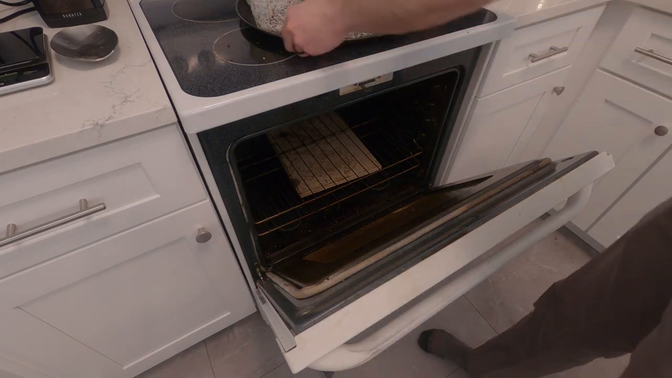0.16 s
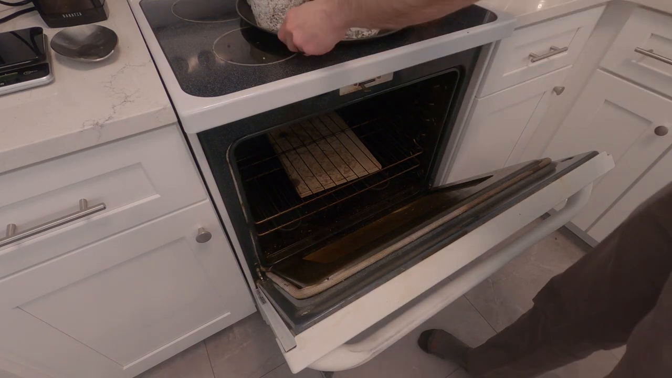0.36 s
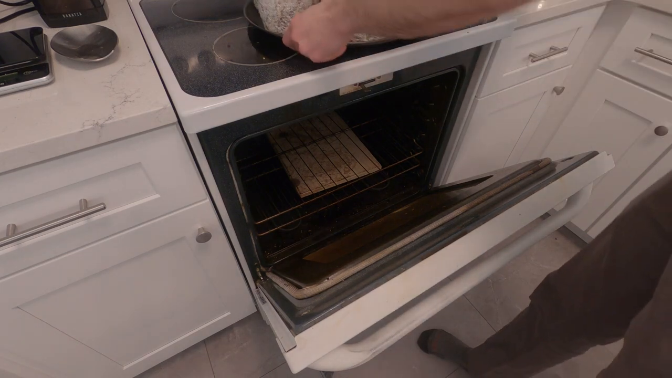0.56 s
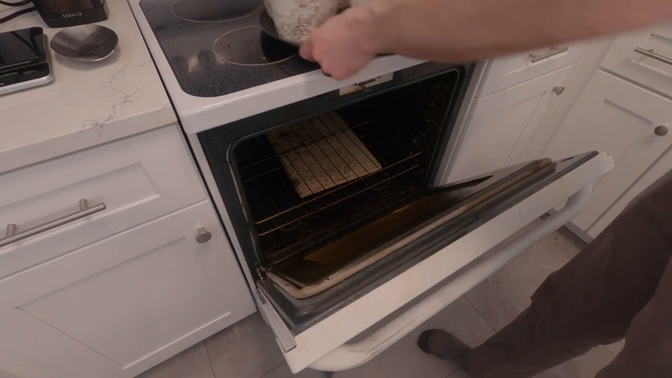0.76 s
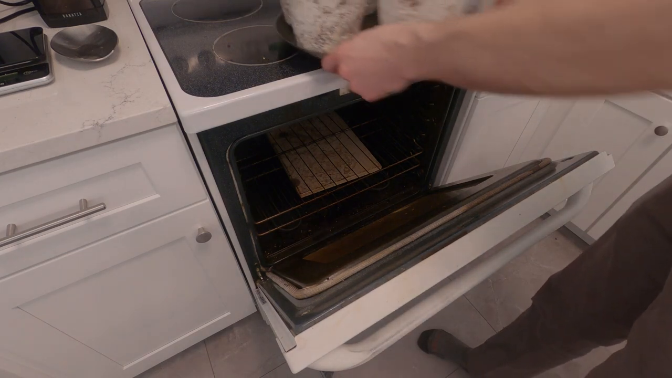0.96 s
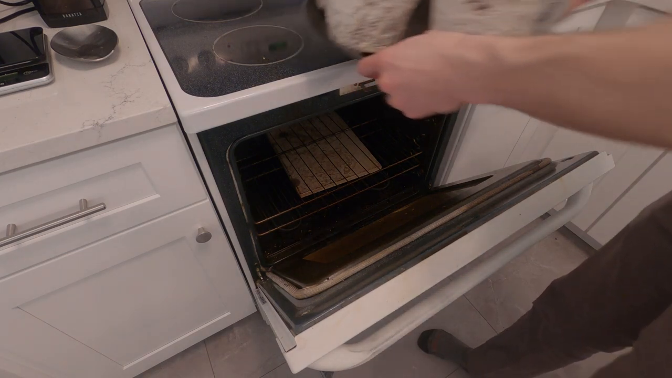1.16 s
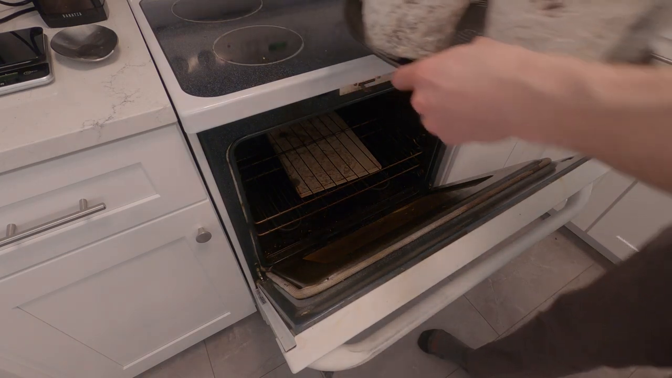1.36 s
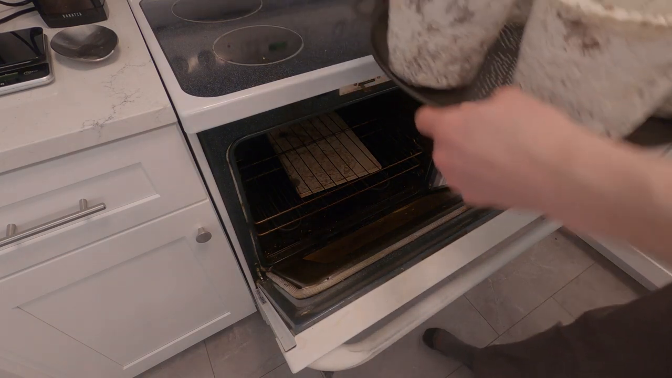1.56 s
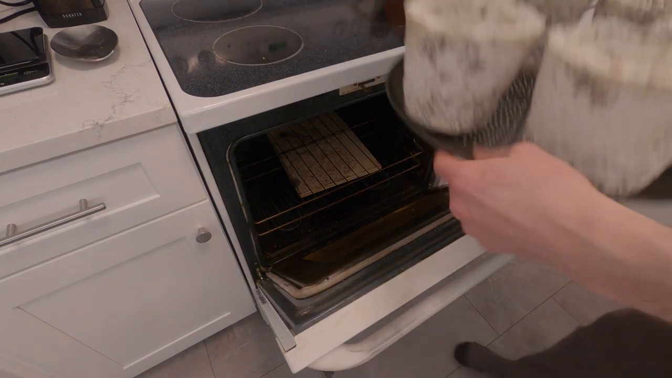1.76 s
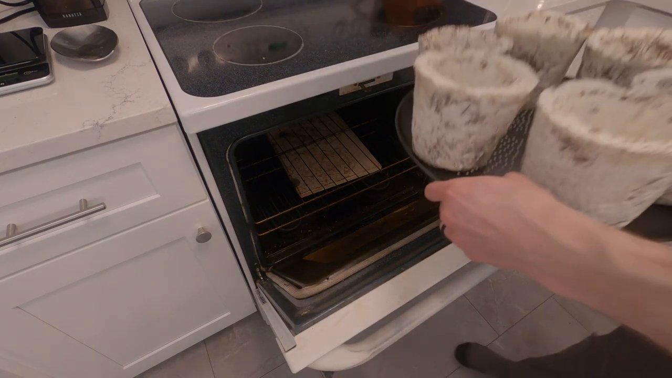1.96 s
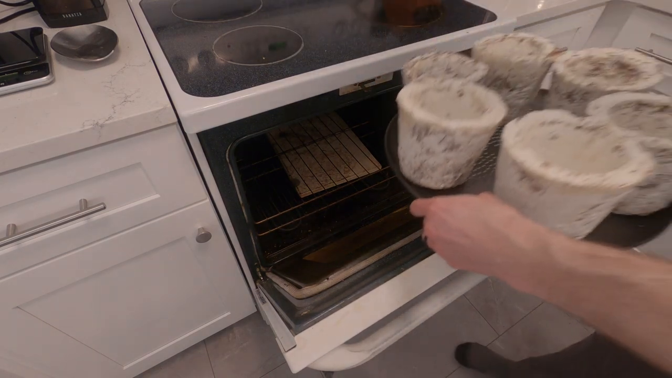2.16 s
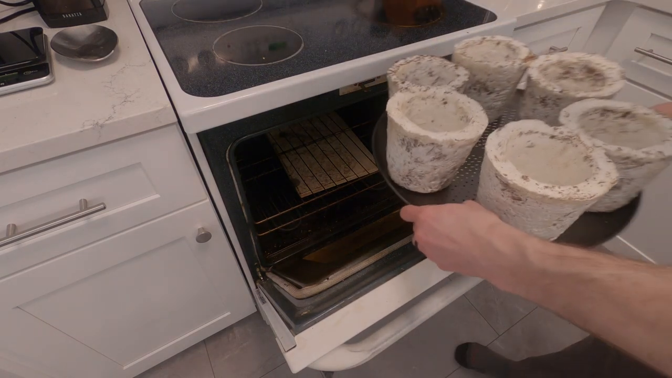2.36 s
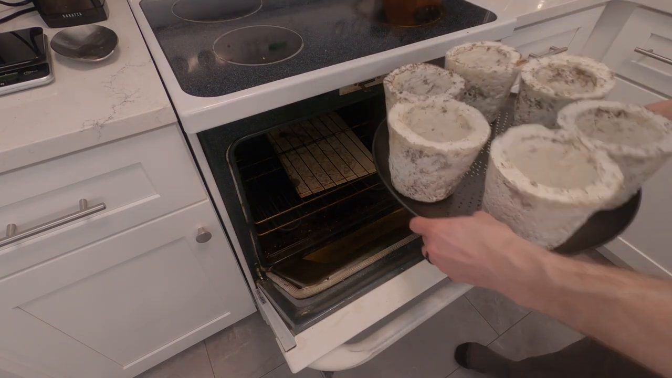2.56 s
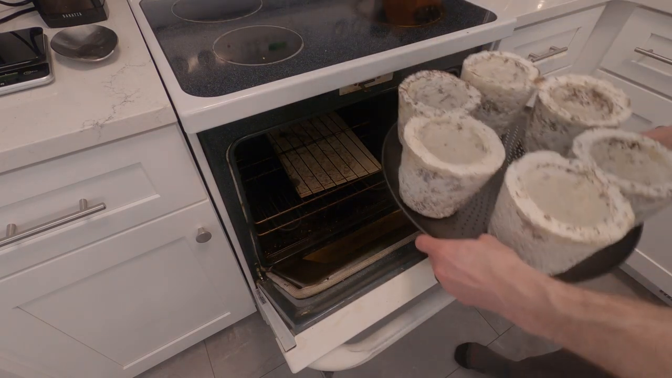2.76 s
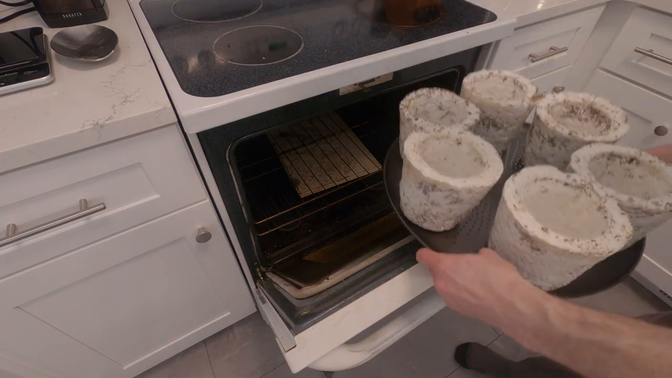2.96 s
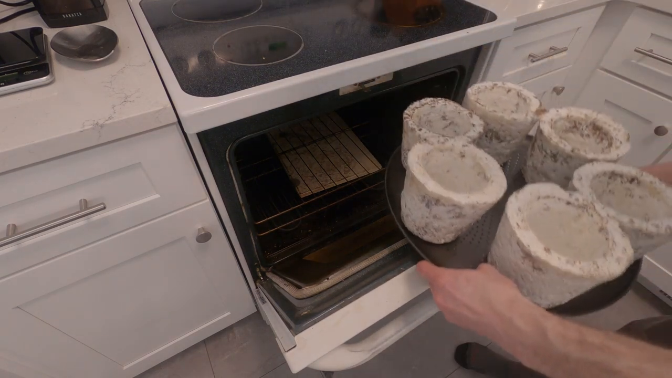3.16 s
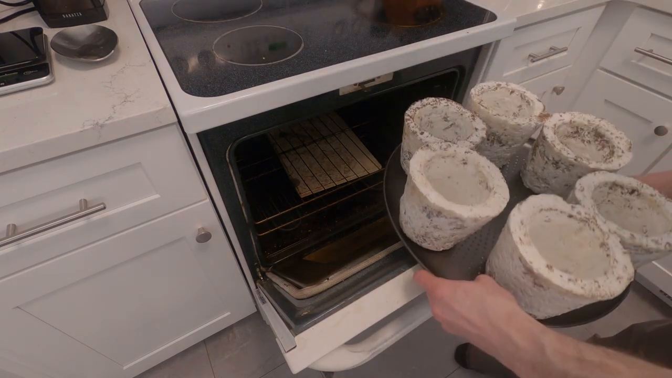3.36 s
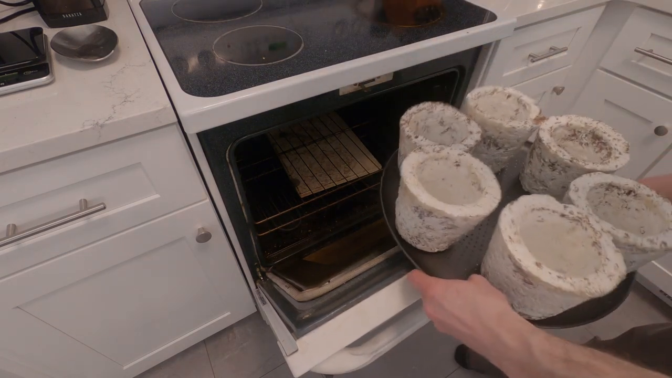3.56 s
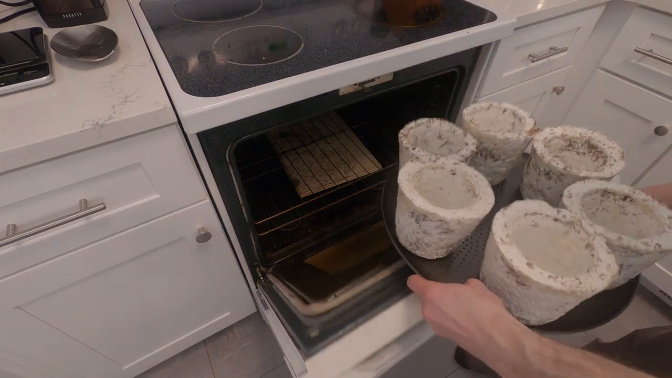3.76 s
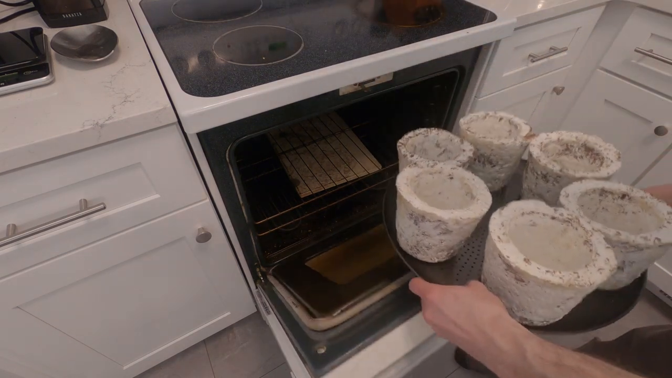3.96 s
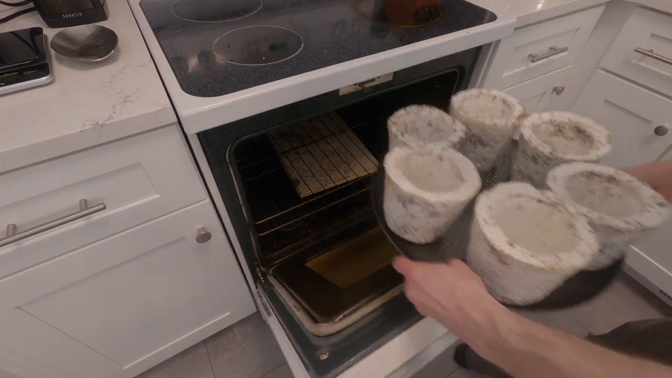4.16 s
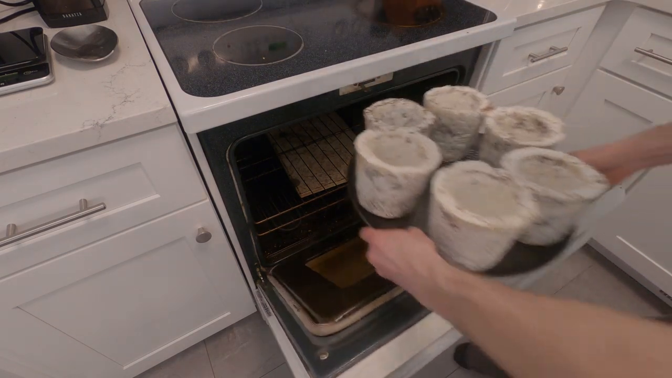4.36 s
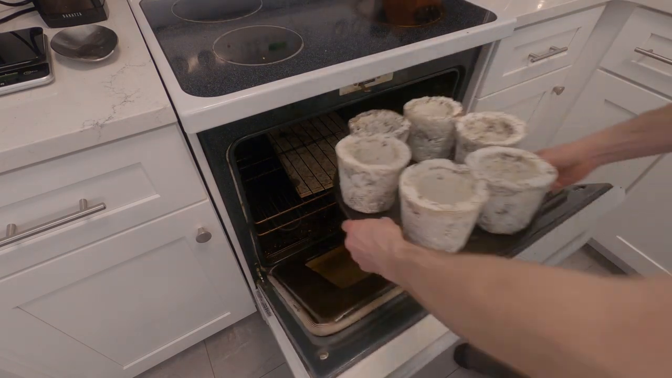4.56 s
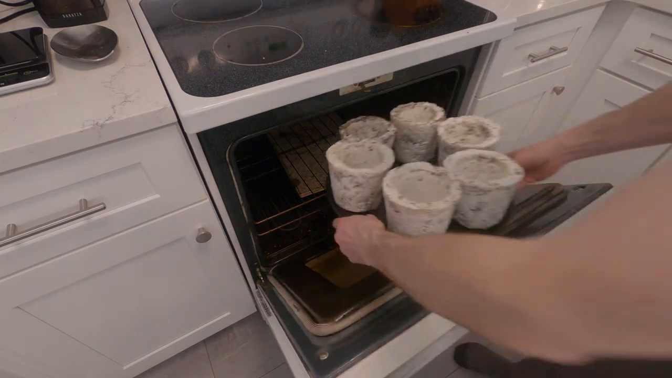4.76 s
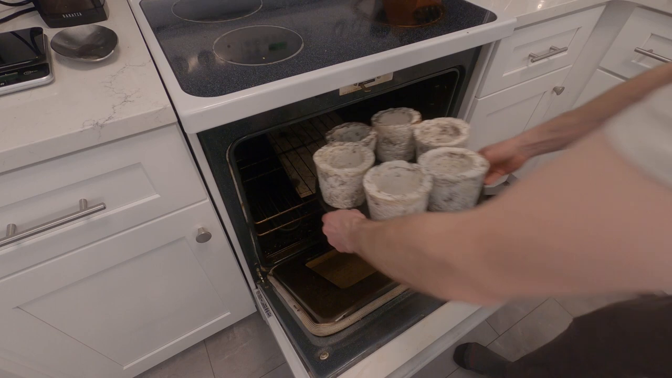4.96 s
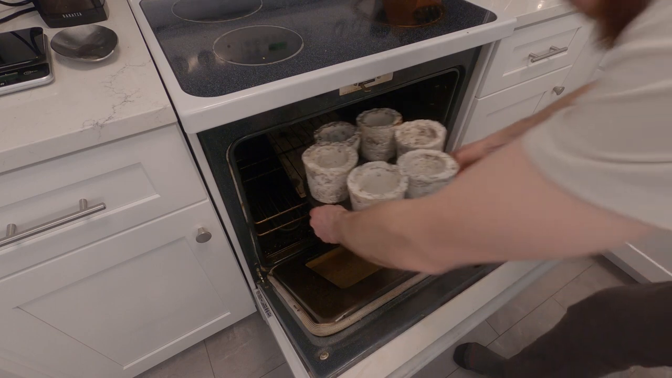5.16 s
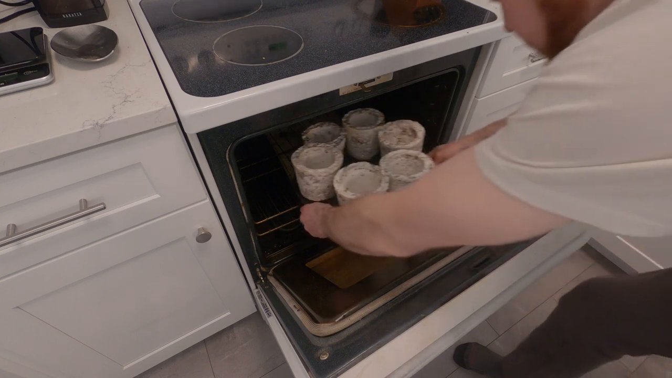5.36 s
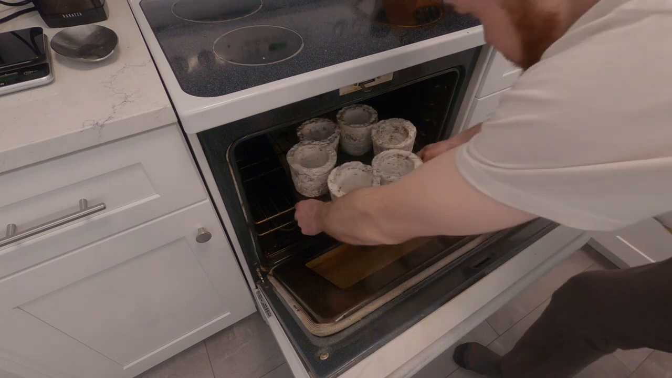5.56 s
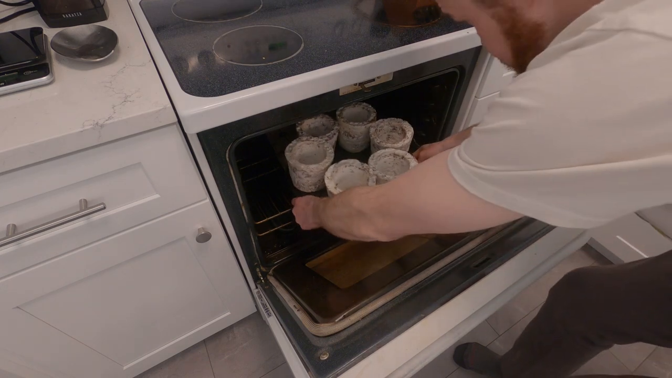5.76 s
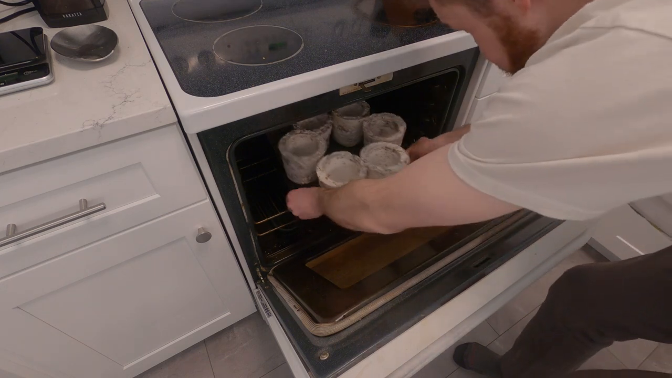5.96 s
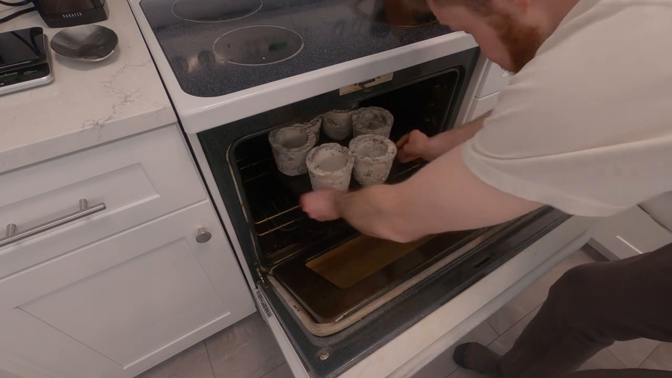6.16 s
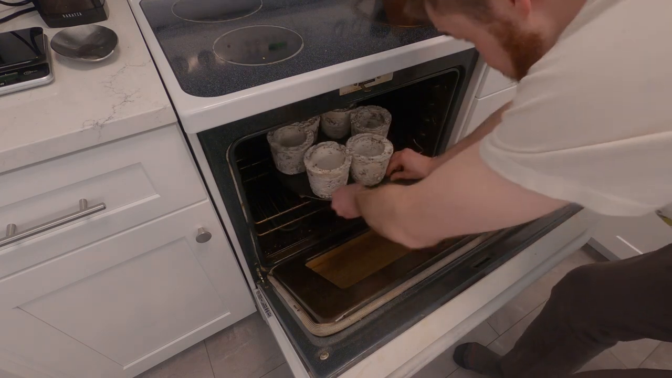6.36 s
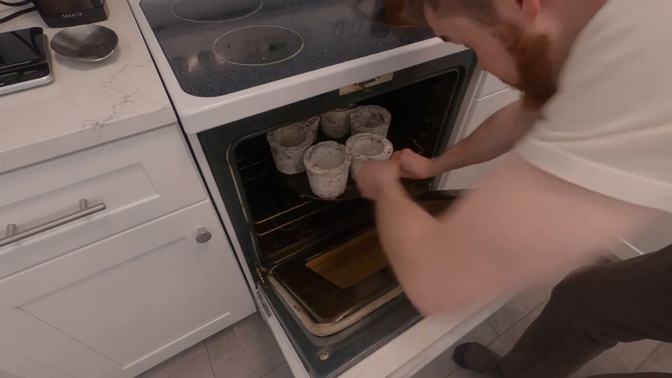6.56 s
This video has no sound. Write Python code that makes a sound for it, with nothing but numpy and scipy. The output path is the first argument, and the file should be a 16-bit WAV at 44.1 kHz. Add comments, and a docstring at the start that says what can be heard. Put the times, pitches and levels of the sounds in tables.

```python
"""In a small kitchen a loaded, perforated metal pan is dragged off a glass cooktop and carried to the oven.
Clothes rustle, the oven door clacks and thuds on its stop, and the pan clatters onto the wire rack and slides in.
Rubbing is shaped noise that catches and slips; blows are decaying noise, ringing modes and a brief room answer.
Squeals and squeaks are gliding tones; beating motor tones, moving air and a thin whine run throughout."""
import sys
import numpy as np
from scipy import signal
from scipy.fft import rfft, irfft, next_fast_len
from scipy.io import wavfile
from scipy.ndimage import map_coordinates

SR = 44100
rng = np.random.default_rng(int(sys.argv[2]) if len(sys.argv) > 2 else 0)


def unload_audio(sound):
    """Save the sound as a 16-bit wav file, at the path given as the first command line argument."""
    columns = np.transpose(np.atleast_2d(sound))
    # keep every value between -1 and 1, then stretch to whole-number steps
    steps = np.round(np.clip(columns, -1, 1) * 32767)
    wavfile.write(sys.argv[1], SR, steps.astype(np.int16))


N = 292383


def amp(db):
    """Decibels to gain."""
    return 10 ** (np.asarray(db) / 20)


def unit(x):
    """x at rms 1."""
    return x / np.sqrt(np.mean(x ** 2) + 1e-20)


def along(points, hz):
    """(Hz, value) points read on a log axis."""
    f, v = np.transpose(points)
    return np.interp(np.log(hz + 1), np.log(f + 1), v)


def wobble(rate_hz):
    """A smooth random curve, rate_hz knots a second."""
    knots = rng.standard_normal(int(N * rate_hz / SR) + 4)
    return map_coordinates(knots, [np.arange(N) * rate_hz / SR])


def tone(hz):
    """A sine of rms 1 that follows a pitch curve."""
    return np.sqrt(2) * np.sin(2 * np.pi * np.cumsum(hz) / SR)


def stroke(s, rise_s, hold_s, fall_s):
    """Attack, hold from time s, release; rise and fall are the times for a tenfold change."""
    t = np.arange(N) / SR - s
    outside = np.maximum(-t, 0) / rise_s + np.maximum(t - hold_s, 0) / fall_s
    return 10 ** -np.minimum(outside, 10)


def together(envelopes):
    """Overlapping envelopes add in power."""
    return np.sqrt(sum(e ** 2 for e in envelopes))


def add(track, s, sound):
    """Mix a sound in at time s."""
    start = round(s * SR)
    track[:, start:start + sound.shape[-1]] += sound[..., :N - start]


def filtered(x, response):
    """x times a complex response of frequency."""
    n = x.shape[-1]
    m = next_fast_len(n + SR // 4, real=True)
    return irfft(rfft(x, m) * response(np.fft.rfftfreq(m, 1 / SR)), m)[..., :n]


def causal(db):
    """The minimum-phase response with these levels: nothing sounds before the blow."""
    cep = irfft(np.log(amp(np.maximum(db, -100))))
    half = len(cep) // 2
    cep[1:half] *= 2
    cep[half + 1:] = 0
    return np.exp(rfft(cep))


def resonances(peaks, hz):
    """Summed response of (Hz, width Hz, dB) resonances, alternating in sign."""
    total = 0
    for k, (centre, width, db) in enumerate(peaks):
        damping = 1j * hz * width
        total = total + (-1) ** k * amp(db) * damping / (centre ** 2 - hz ** 2 + damping)
    return total


# stereo width of the room: (frequency [Hz], side-to-mid level [dB])
WIDTH = [(40, -12), (125, -18), (280, -13.5), (640, -9), (1400, -8), (3100, -7), (5000, -3.5), (8000, 0)]


def spread(pair, width_db=0):
    """Two unrelated signals as left and right: alike in the bass, unrelated in the treble."""
    def mid_side(hz):
        side_gain = amp(along(WIDTH, hz) + width_db)
        return np.array([np.ones_like(hz), side_gain]) / np.hypot(1, side_gain)
    mid, side = filtered(pair, mid_side)
    return np.array([mid + side, mid - side])


def friction(spectrum, rough_db, rate_hz, t60_s=0):
    """Stereo noise of rms 1 that catches and slips about rate_hz times a second; metal rings on for t60_s."""
    slips = rng.standard_normal((2, N)) * amp(rough_db * wobble(rate_hz))
    if t60_s:
        t = np.arange(SR // 2) / SR
        modes = rng.standard_normal((2, len(t))) * amp(-60 * t / t60_s)
        modes[:, 0] = .5 * np.linalg.norm(modes, axis=1)  # the contact itself, ahead of the dense ring
        slips = signal.fftconvolve(slips, modes, axes=1)[:, :N]
    return unit(spread(filtered(slips, lambda hz: amp(along(spectrum, hz)))))


def grains(spectrum, rate_hz, scatter_db, t60_s):
    """Tiny separate catches, together at rms 1, rate_hz a second, of uneven size, each ringing briefly."""
    sizes = amp(scatter_db * rng.uniform(-1, 1, N))
    catches = (rng.random(N) < rate_hz / SR) * rng.choice([-1, 1], N) * sizes
    t = np.arange(SR // 8) / SR
    rings = rng.standard_normal((2, len(t))) * amp(-60 * t / t60_s)
    rattle = signal.fftconvolve(catches[None], rings, axes=1)[:, :N]
    return unit(spread(filtered(rattle, lambda hz: amp(along(spectrum, hz)))))


def rubbed(peaks):
    """Resonances kept ringing by friction, at rms 1."""
    return unit(spread(filtered(rng.standard_normal((2, N)), lambda hz: resonances(peaks, hz))))


def ring(modes):
    """Struck modes, at slightly new strengths each time and nearly in step in both ears."""
    t = np.arange(SR) / SR
    hz, db, t60_s = np.transpose(modes)[:, :, None]
    ear_offset = amp(along(WIDTH, hz) - 20) * rng.standard_normal((2, *hz.shape))
    phase = rng.uniform(0, 2 * np.pi, hz.shape) + ear_offset
    size = amp(db + rng.standard_normal(hz.shape) - 60 * t / t60_s)
    attack = 1 - np.exp(-t / 0.00031)
    return (size * np.sin(2 * np.pi * hz * t + phase)).sum(1) * attack


def retuned(modes, share):
    """The same modes, each a random share higher or lower."""
    return [(hz * (1 + share * rng.standard_normal()), db, t60_s) for hz, db, t60_s in modes]


# reverberation of the room: (frequency [Hz], T60 [s])
KITCHEN = [(100, 1), (500, 0.58), (1500, 0.75), (4000, 0.46), (8000, 0.49), (15000, .18)]


def burst(spectrum, t60_s, room_db):
    """A blow's dense, fast-dying modes and the kitchen's longer, wider answer."""
    t = np.arange(SR) / SR
    hz, s, z = signal.stft(rng.standard_normal((2, SR)), SR, nperseg=256)
    decay = amp(-60 * s / along(KITCHEN, hz)[:, None])
    tail = signal.istft(z * decay, SR, nperseg=256)[1][:, :SR]
    direct = rng.standard_normal((2, SR)) * amp(-60 * t / t60_s) * (1 - np.exp(-t / 0.00061))
    room = spread(tail) * (1 - np.exp(-t / 0.0022))
    blow = spread(direct, width_db=-6) + amp(room_db) * room

    def colour(f):
        levels_db = along(spectrum, f)
        return causal(levels_db) / np.sqrt(np.mean(amp(levels_db) ** 2))
    return filtered(blow, colour)


# appliance motors and mains: (frequency [Hz], relative level [dB])
HUM = [(46.6, -56), (59.2, -44.3), (65.5, -50), (120, -54.5), (140, -50), (168.2, -61), (280, -67)]


def hum():
    """Steady motor tones beat against each other, each wavering slowly in level."""
    t = np.arange(N) / SR
    total = 0
    for hz, db in HUM:
        level = amp(db + 0.36 * wobble(0.9))
        total = total + level * np.sqrt(2) * np.sin(2 * np.pi * (hz * t + rng.random()))
    return amp(-3) * total


# moving air: (frequency [Hz], relative level per Hz [dB])
AIR = [(8, -21), (18, 4), (100, 1.5), (200, 2), (300, -5.5), (450, -7.5), (700, -15), (1100, -18.5),
       (1800, -24), (3000, -30.5), (4500, -45), (7000, -40.5), (10000, -57), (15000, -67)]


def air():
    """Moving air is broad noise, slightly uneven in level."""
    return amp(-50) * friction(AIR, rough_db=0.73, rate_hz=15)


WHINE_HZ, WHINE_DB, SWELL_DB = 3084, -79.5, -72.5


def whine():
    """A thin electrical tone of unsteady pitch swells once."""
    swell = amp(SWELL_DB) * stroke(4.38, rise_s=.18, hold_s=.4, fall_s=.1)
    return together([amp(WHINE_DB), swell]) * tone(WHINE_HZ + 14 * wobble(60))


# rustling cloth: (frequency [Hz], relative level per Hz [dB])
FABRIC = [(300, -19), (900, -1), (1600, 2.5), (3500, 1), (6500, -8.5), (10000, -22), (14500, -31.5),
          (16000, -47)]
# silky swish: (frequency [Hz], relative level per Hz [dB])
SILKY = [(2500, -3), (4500, 6), (8000, 2.5), (10500, -10), (14500, -16), (15500, -22)]
# movements of sleeves and trousers:
# (time [s], half-length [s], relative rustle level [dB], swish level [dB])
MOVES = [(0.185, 0.052, -75, -68.5), (0.348, 0.14, -77, -70), (1.19, 0.13, -65, -64),
         (1.77, 0.14, -59.5, -68.5), (2.25, .07, -84, -74), (2.452, 0.082, -70, -65),
         (3.645, 0.29, -63.5, -68), (4.221, 0.0078, -63.5, -84), (4.3, 0.06, -70, -64),
         (5.258, 0.3, -63, -95), (6.234, 0.49, -60.5, -68)]
CLOTH_REST_DB = -74  # relative rustle level; clothes never lie quite still


def clothes():
    """Cloth rustles and swishes with the speed of each movement."""
    t = np.arange(N) / SR
    rustle, swish = amp(CLOTH_REST_DB), 0
    for s, half_length_s, rustle_db, swish_db in MOVES:
        speed = np.exp(-np.minimum(((t - s) / half_length_s) ** 2, 20))
        rustle = together([rustle, amp(rustle_db) * speed])
        swish = swish + amp(swish_db) * speed
    out = amp(4) * rustle * friction(FABRIC, rough_db=1, rate_hz=82)
    return out + swish * friction(SILKY, rough_db=1.5, rate_hz=180)


# dull bumps of pan, door and feet: (time [s], level [dB], frequency [Hz], T60 [s])
BUMPS = [(0.11, -48, 350, .12), (0.834, -33.5, 132.5, 0.31), (0.884, -28, 162, 0.098),
         (0.919, -27, 156, 0.12), (0.975, -31, 46.3, 0.25), (3.277, -39.5, 205.8, 0.22),
         (3.31, -37.5, 36.3, 0.55), (3.435, -33.5, 380, 0.051), (3.895, -35.5, 193, 0.2),
         (4.266, -40.5, 363, 0.094), (6.283, -26, 203, 0.095)]


def bumps():
    """Soft contacts move one low mode each."""
    out, t = np.zeros((2, N)), np.arange(SR) / SR
    attack = 1 - np.exp(-t / 0.0043)
    for s, db, hz, t60_s in BUMPS:
        add(out, s, amp(db - 60 * t / t60_s) * np.sin(2 * np.pi * hz * t) * attack)
    return out


# hiss on the glass: (frequency [Hz], relative level per Hz [dB])
GLASS = [(700, -33), (1200, -14.5), (2100, -13), (2600, -1.5), (3200, -7.5), (4000, -8.5), (5100, -13.5),
         (7400, -16), (10000, -30), (13500, -35), (15500, -57)]
# grinding rim: (frequency [Hz], relative level per Hz [dB])
GRIND = [(120, -28), (200, -1), (308, -5.5), (450, -12), (750, -10.5), (1150, -9.5), (1450, -16),
         (1750, -8.5), (2090, -14.5), (3000, -14), (3900, -16), (6600, -73)]
# grit under the pan: (frequency [Hz], relative level per Hz [dB])
GRIT = [(1000, -18), (2200, -5), (2700, 1), (4500, -1), (5500, -12), (7500, -9), (10000, -24.5),
        (15500, -50)]
# resonances of the dragged rim: (frequency [Hz], width [Hz], relative level [dB])
RIM = [(2330, 70, -1), (2660, 100, -2), (3080, 160, 5), (3360, 89, 6), (3850, 150, -11)]
# pulls of the pan over the glass: (time [s], rise [s], hold [s], hiss level [dB], grind level [dB])
PULLS = [(0.455, 0.019, 0.008, -46.5, -54), (0.635, 0.15, 0.054, -47, -54.5),
         (0.759, 0.065, 0.018, -50, -53.5), (0.832, 0.086, 0.038, -49, -47),
         (0.914, 0.024, 0.0079, -51, -44)]
# snaps of grit: (time [s], level [dB])
SNAPS = [(0.451, -50), (0.464, -44), (.63, -54), (.657, -47), (.686, -49), (0.773, -46), (.853, -47),
         (0.908, -42)]
# knocks of the rim on the cooktop: (time [s], level [dB])
CATCHES = [(.111, -53), (.825, -48), (.837, -42.5), (.906, -45), (.922, -41), (.93, -44)]
PULL_FALL_S = 0.11  # the pan comes to rest after each pull


def cooktop():
    """The pan catches, hisses grittily over the glass with its rim ringing, and grinds off the edge."""
    pulls = [(stroke(s, rise_s, hold_s, PULL_FALL_S), hiss_db, grind_db)
             for s, rise_s, hold_s, hiss_db, grind_db in PULLS]
    hiss = together(amp(db) * pull for pull, db, _ in pulls)
    grind = together(amp(db) * pull for pull, _, db in pulls)
    rim = amp(-8) * unit(rubbed(RIM) * amp(3 * wobble(55)))
    grit = amp(-5) * grains(GRIT, rate_hz=120, scatter_db=7, t60_s=.015)
    slide = amp(-1.5) * friction(GLASS, rough_db=1, rate_hz=130, t60_s=0.21)
    crunch = amp(-3) * grains(GRIND, rate_hz=170, scatter_db=6, t60_s=.035)
    scour = amp(-3) * friction(GRIND, rough_db=3, rate_hz=160, t60_s=0.19)
    out = hiss * (slide + rim + grit) + grind * (scour + crunch)
    for s, db in SNAPS:
        add(out, s, amp(db) * burst(GRIT, t60_s=.035, room_db=-17))
    for s, db in CATCHES:
        add(out, s, amp(db) * burst(GRIND, t60_s=0.059, room_db=-27))
    return out


# stick-slip squeals of the pan on the glass, in the hands and on the wires:
# (time [s], hold [s], start [Hz], end [Hz], relative level [dB], flutter [1/s])
SQUEALS = [(.625, .07, 3230, 3080, -50, 220), (.765, .025, 3400, 3330, -52, 160),
           (.77, .045, 3030, 2870, -56, 160), (.85, .075, 2780, 2670, -55, 200),
           (.9, .03, 3130, 2990, -52, 200), (1.988, .022, 3700, 3670, -62, 50),
           (5.609, .033, 2385, 2375, -54, 90), (5.81, .07, 700, 708, -53, 110),
           (5.89, .1, 706, 700, -59, 110), (5.81, .04, 1350, 1372, -52, 90),
           (5.85, .075, 2290, 2330, -59, 160), (5.86, .065, 3500, 3470, -61, 160),
           (5.92, .045, 1352, 1362, -52, 60), (5.98, .07, 1385, 1420, -57, 70),
           (6.085, .03, 1412, 1408, -51, 50), (6.06, .025, 3100, 3060, -53, 220),
           (6.062, .04, 2740, 2840, -49.5, 160), (6.075, .028, 2490, 2550, -51, 140),
           (6.128, .02, 3540, 3700, -50, 280), (6.14, .035, 2800, 2730, -48, 140),
           (6.19, .04, 1670, 1700, -53, 160)]
SQUEAL_ROUGH, SQUEAL_RISE_S, SQUEAL_FALL_S = .9, .011, .027


def squeals():
    """Each squeal is a fluttering tone that glides as the contact point moves."""
    out = np.zeros((2, N))
    t = np.arange(SR // 2) / SR - .1  # lead-in for the rise
    for s, hold_s, start_hz, end_hz, db, flutter_hz in SQUEALS:
        outside = np.maximum(-t, 0) / SQUEAL_RISE_S + np.maximum(t - hold_s, 0) / SQUEAL_FALL_S
        level = amp(db) * 10 ** -outside
        a, b = (map_coordinates(knots, [(t - t[0]) * flutter_hz], mode="mirror")
                for knots in rng.standard_normal((2, SR // 256)))
        pitch_hz = np.interp(t, [0, hold_s], [start_hz, end_hz])
        carrier = np.exp(2j * np.pi * np.cumsum(pitch_hz) / SR)
        voice = (1 + SQUEAL_ROUGH * (a + 1j * b)) * carrier
        ears = np.exp(1j * amp(along(WIDTH, start_hz)) * np.array([[1], [-1]]))  # opposite phase shifts
        add(out, s + t[0], level * (voice * ears).real)
    return out


# small creaks of the loaded pan in the air: (time [s], frequency [Hz], relative level [dB])
CREAKS = [(1.5, 4330, -74), (2.0, 1800, -57.5), (2.175, 2480, -73), (2.175, 3880, -76), (2.813, 3620, -70),
          (2.82, 5020, -77), (2.823, 3250, -70), (2.825, 1650, -65), (3.16, 5140, -72)]
CREAK_WIDTH_HZ = 160


def creaks():
    """Each creak is a narrow band of noise that swells and dies within a few hundredths of a second."""
    out, t = np.zeros((2, N)), np.arange(SR) / SR
    swell = t / 0.0075 * np.exp(1 - t / 0.0092)
    for s, hz, db in CREAKS:
        noise = rng.standard_normal(SR)
        creak = unit(filtered(noise, lambda f: resonances([(hz, CREAK_WIDTH_HZ, 0)], f)))
        add(out, s, amp(db) * creak * swell)
    return out


# modes of the flexing pan: (frequency [Hz], relative level [dB], T60 [s])
PING = [(1600, -13, .25), (1795, -4, .5), (1880, -11, .55), (2065, -4.5, .65), (2110, -13, .45),
        (2780, -15, .2), (3630, -11, .4), (3700, -9, .25), (5520, -15, .12)]


def ping():
    """The carried pan flexes once: its modes build up, ring and chatter."""
    out, t = np.zeros((2, N)), np.arange(SR) / SR
    swell = 1 - np.exp(-t / 0.0076)  # flexing, not a blow
    chatter = amp(1.5 * wobble(220)[:SR])
    add(out, 1.987, amp(-54.5) * ring(PING) * swell * chatter)
    return out


# squeak of the load shifting on the pan: (time [s], frequency [Hz], level [dB])
SQUEAK = [(2.755, 4400, -92), (2.777, 4520, -75), (2.795, 4680, -84), (2.815, 4790, -78),
          (2.853, 4720, -74), (2.885, 4660, -81), (2.91, 4540, -76), (2.935, 4420, -73), (2.962, 4400, -75),
          (2.98, 4380, -90)]


def squeak():
    """A faint tone follows a jittery pitch curve as the load shifts."""
    t = np.arange(N) / SR
    s, hz, db = np.transpose(SQUEAK)
    pitch_hz = np.interp(t, s, hz) + 25 * wobble(430)
    level = amp(np.interp(t, s, db, left=-140, right=-140))
    return level * tone(pitch_hz) * np.ones((2, 1))


# hinge clack: (frequency [Hz], relative level per Hz [dB])
CLACK = [(76, -24), (130, 2.5), (228, -3.5), (726, -11), (1080, -7), (1350, -9.5), (1460, -8.5),
         (1680, -12), (2270, -8.5), (3520, -6.5), (4390, -12.5), (7230, -23.5), (13200, -54), (15500, -57)]
# hinge modes: (frequency [Hz], relative level [dB], T60 [s])
HINGE = [(334, -1, .14), (576, -4, .16), (1136, -4, .24), (1470, -1, .22), (1771, -8, .3), (2003, -2, .16),
         (2300, 1, .21), (2509, -6, .3), (3058, 0, .3), (3359, -8, .35), (3560, -4, .18), (3725, -5, .2),
         (4393, -12, .3)]
# door on its stop: (frequency [Hz], relative level per Hz [dB])
THUD = [(70, -32), (140, -16), (205, -4), (300, -7), (480, -1), (640, -1), (800, -3.5), (1000, -.5),
        (1300, -7), (1550, -12), (2000, -14), (3400, -15), (5000, -27.5), (8300, -42), (15500, -66)]
# door panel modes: (frequency [Hz], relative level [dB], T60 [s])
DOOR = [(200, -5, .18), (214, 5.5, .22), (313, -2, .28), (404, -12, .26), (455, -1, .22), (503, -7, .3),
        (604, -3, .33), (648, -4, .24), (690, -4, .12), (738, -5, .16), (778, -2, .2), (880, -6, .15),
        (927, -1, .22), (965, -5, .3), (1005, -2, .2), (1060, -3, .17), (1115, -5, .15), (1170, -9, .16),
        (1244, -4, .22), (1305, -9, .15), (1430, -8, .2), (1717, -5, .18), (1933, -9, .23),
        (2239, -12, .23), (2845, -11, .22), (3128, -14, .24), (3480, -11, .22)]
# the door lands and chatters once: (time [s], relative level [dB])
LANDINGS = [(4.8955, -21.5), (4.902, -23.5)]


def door():
    """The hinge clacks and rings; later the door thuds on its stop, its panel rings and the hinge rattles."""
    out = np.zeros((2, N))
    clack = amp(-32) * burst(CLACK, t60_s=0.12, room_db=-10)
    add(out, 3.2755, clack + amp(-52) * ring(DOOR) + amp(-43.5) * ring(HINGE))
    # the stop is touched just before it takes the weight
    add(out, 4.881, amp(-56.5) * burst(THUD, t60_s=0.18, room_db=5))
    for s, db in LANDINGS:
        add(out, s, amp(db) * burst(THUD, t60_s=.068, room_db=-15.5))
    add(out, 4.8955, amp(-28.5) * ring(DOOR))
    rattle = amp(-5) * ring(HINGE) + amp(6) * burst(CLACK, t60_s=.08, room_db=-15)
    add(out, 4.919, amp(-42.5) * rattle)  # the door rebounds
    return out * amp([[-1.2], [1.2]])  # to the right


# leg rubbing on the door: (frequency [Hz], relative level per Hz [dB])
RUB = [(150, -38), (308, 8.5), (500, -11), (760, -5), (1100, -3.5), (1650, -3), (3890, -7), (6870, -16.5),
       (15500, -43)]
# drone of the pressed door: (frequency [Hz], relative level per Hz [dB])
DRONE = [(150, -33), (300, 6), (420, -2.5), (620, -1), (800, -1), (1150, -6), (1700, -5), (2400, -14),
         (5000, -32), (12000, -60)]
# a leg presses along the door, then slips off it:
# (time [s], rise [s], hold [s], relative rub level [dB], drone level [dB])
RUBS = [(3.694, 0.071, .045, -48.5, -58), (3.765, 0.055, 0.013, -47.5, -50), (3.784, 0.037, .018, -47, -42),
        (3.825, .03, 0.028, -50.5, -50), (3.864, .04, 0.019, -49.5, -50.5)]
RUB_FALL_S = 0.085


def leg_on_door():
    """A leg rubs the door downwards: cloth drags and snags, and the pressed door judders."""
    pushes = [(stroke(s, rise_s, hold_s, RUB_FALL_S), rub_db, drone_db)
              for s, rise_s, hold_s, rub_db, drone_db in RUBS]
    snags = amp(-2) * grains(RUB, rate_hz=230, scatter_db=6, t60_s=.018)
    drag = amp(-4) * friction(RUB, rough_db=-0.5, rate_hz=220)
    judder = grains(DRONE, rate_hz=300, scatter_db=5, t60_s=.04)
    rub = together(amp(db) * push for push, db, _ in pushes) * (drag + snags)
    return rub + together(amp(db) * push for push, _, db in pushes) * judder


# rim tick on a wire: (frequency [Hz], relative level per Hz [dB])
TICK = [(300, -29), (1400, -15), (2300, 2.5), (3800, -3.5), (5200, -13), (8000, -22), (12000, -39),
        (15500, -68)]
# pan rim modes: (frequency [Hz], relative level [dB], T60 [s])
PAN = [(431, -8, .5), (931, -9, .5), (1185, -6, .25), (1890, -6, .35), (2040, -4, .17), (2160, -5, .17),
       (2380, -5, .4), (2445, -1, .16), (2595, 4, .18), (2760, -3, .16), (2895, -3, .15), (3117, -9, .4),
       (3451, -7, .3), (3540, -5, .17), (3704, -2, .18), (3880, -6, .16), (4150, -9, .15), (4770, -17, .22),
       (5300, -13, .15), (6546, -20, .18)]
# ticks of the rim against a wire: (time [s], relative level [dB], edge above 5 kHz [dB])
TICKS = [(5.5365, -34, 7), (5.542, -34, 6), (5.661, -33.5, 2), (5.668, -37, 1), (5.696, -36, -3),
         (5.785, -38, -2), (6.012, -44, 8), (6.140, -41, 11)]


def ticks():
    """The pan's rim strikes single wires and rings."""
    out = np.zeros((2, N))
    for s, db, edge_db in TICKS:
        tick = burst(TICK, t60_s=.065, room_db=-14) + amp(-10) * ring(PAN)
        edge = [(3800, 0), (6500, edge_db)]
        add(out, s, amp(db) * filtered(tick, lambda hz: causal(along(edge, hz))))
    return out


# pan on rack: (frequency [Hz], relative level per Hz [dB])
CLATTER = [(100, -43), (320, -8), (700, -10), (950, -2.5), (1800, -5.5), (2500, -8.5), (3800, -12),
           (5200, -23), (8000, -36), (12000, -52), (15500, -66)]
# wires, scraped or cracked against: (frequency [Hz], relative level per Hz [dB])
WIRE = [(210, -25), (350, -10), (444, -15), (554, -6.5), (600, -6.5), (965, -6.5), (1710, 0), (2200, -4.5),
        (2840, 0), (5180, -6), (12000, -29), (15500, -46)]
# loaded rack modes: (frequency [Hz], relative level [dB], T60 [s])
RACK = [(290, -6, .4), (338, -4, .35), (428, -9, .35), (470, -9, .3), (590, -9, .25), (705, -10, .45),
        (895, -2, .2), (937, -4, .22), (1002, 0, .2), (1048, -6, .18), (1178, -6, .2), (1273, -3, .2),
        (1345, -5, .26), (1429, -5, .24), (1525, -3, .2), (1615, -5, .22), (1688, -4, .22), (1800, -3, .2),
        (1865, 2, .28), (1892, -4, .25), (2080, -9, .22), (2265, -7, .38), (2405, -10, .25),
        (2570, -1, .25), (2776, -10, .35), (2860, -9, .35), (3125, -7, .38), (3460, -7, .4), (3705, -8, .3),
        (3900, -10, .25), (4160, -13, .22), (4580, -15, .2), (5300, -17, .18)]
# the pan's weight lands on the rack:
# (time [s], relative level [dB], weight below 1.5 kHz [dB], edge above 5 kHz [dB])
CONTACTS = [(5.546, -43, 5, 5), (5.574, -44.5, 11, 7), (5.673, -41, 3, 3), (5.6897, -27.5, 1, -10),
            (5.694, -29, 2, 1), (5.701, -30, 6.5, -1), (5.720, -37, 6, -9), (5.752, -35, 0, 1),
            (5.762, -39, -2, 0), (5.7717, -28.5, 0, -6), (5.783, -30.5, 4, 3), (5.794, -36, -1, 4),
            (5.822, -44, 3, 0), (5.868, -47, 4, 0), (6.146, -41, 4, 10), (6.155, -40, 0, 4),
            (6.18, -45, -4, 4), (6.222, -42, 1.5, 1), (6.231, -44, 4, 0)]
RACK_DRIFT = .003  # share of pitch; the shifting load retunes the rack at every contact


def contacts():
    """The pan's weight hits the rack: a clatter, a crack of the wires and the rack's ring."""
    out = np.zeros((2, N))
    for s, db, weight_db, edge_db in CONTACTS:
        hit = amp(-1.2) * burst(CLATTER, t60_s=.05, room_db=-17)
        hit += amp(-12.8) * ring(retuned(RACK, RACK_DRIFT))
        hit += amp(-5) * burst(WIRE, t60_s=.01, room_db=-27)
        balance = [(1300, weight_db), (2200, 0), (3200, 0), (6500, edge_db)]
        add(out, s, amp(db) * filtered(hit, lambda hz: causal(along(balance, hz))))
    return out


# shoves of the pan along the rack: (time [s], rise [s], hold [s], relative scrape level [dB])
SHOVES = [(5.659, 0.014, 0.0091, -47), (5.853, 0.19, 0.049, -47.5), (6.008, 0.051, 0.011, -44),
          (6.08, 0.056, 0.02, -41), (6.139, 0.022, 0.015, -33.5), (6.22, 0.04, 0.022, -40),
          (6.368, 0.043, 0.016, -48.5)]
SHOVE_FALL_S = 0.18


def scrapes():
    """Each shove scrapes the pan over the wires, with separate scratches."""
    shoves = together(amp(db) * stroke(s, rise_s, hold_s, SHOVE_FALL_S)
                      for s, rise_s, hold_s, db in SHOVES)
    scratches = amp(-7.5) * grains(WIRE, rate_hz=200, scatter_db=7, t60_s=.016)
    return shoves * (amp(-4.5) * friction(WIRE, rough_db=1, rate_hz=130, t60_s=0.16) + scratches)


# oven cavity walls: (frequency [Hz], width [Hz], relative level [dB])
SHUDDER = [(72.5, 2.8, 9), (166, 31, -9.5), (284, 43, -14)]
# the oven takes the load, then the push: (time [s], hold [s], fall [s], level [dB])
SHUDDERS = [(5.70, .08, 1, -42), (6.165, .09, .15, -38.5)]
SHUDDER_RISE_S = 0.14


def shudder():
    """The oven cavity's walls resonate at low pitch under the load and the push."""
    level = together(amp(db) * stroke(s, SHUDDER_RISE_S, hold_s, fall_s)
                     for s, hold_s, fall_s, db in SHUDDERS)
    return level * rubbed(SHUDDER)


def rack():
    """Ticks, contacts, scrapes and the oven's shudder, slightly to the right."""
    return (ticks() + contacts() + scrapes() + shudder()) * amp([[-.7], [.7]])


CABINET_DB, CABINET_T60_S, CABINET_FROM_HZ = -6.5, 0.085, 1600  # hard fronts close by throw the treble back


def cabinets(x):
    """Early reflections from worktop and cupboards comb the treble of the rubbing sounds."""
    t = np.arange(SR // 32) / SR
    echoes = rng.standard_normal((2, len(t))) * amp(-60 * t / CABINET_T60_S)
    echoes /= np.linalg.norm(echoes, axis=1, keepdims=True)

    def comb(hz):
        share = amp(CABINET_DB) * hz ** 2 / (hz ** 2 + CABINET_FROM_HZ ** 2)
        return (1 + share * rfft(echoes, 2 * (len(hz) - 1))) / np.hypot(1, share)
    return filtered(x, comb)


def scene():
    """All sources; the rubbing sounds and cooktop knocks pass the cabinets."""
    near_cabinets = cabinets(clothes() + cooktop() + leg_on_door())
    appliances = hum() + air() + whine()
    carried = creaks() + ping() + squeak()
    return appliances + near_cabinets + bumps() + squeals() + carried + door() + rack()


# colour of the two microphone ports: (frequency [Hz], left-to-right level [dB])
TILT = [(100, .2), (380, 1.1), (700, 1.5), (1300, 1.4), (2400, 2.6), (4400, 2.2), (8000, 0), (13000, -6.5)]
TOP_HZ = 15500


def record(dry):
    """Two ports of slightly different colour, the left one two samples late, and the band limit."""
    side = np.array([[.5], [-.5]])

    def ports(hz):
        delay = np.exp(-2j * np.pi * hz * side * 2 / SR)
        return amp(side * along(TILT, hz)) * delay * (hz < TOP_HZ)
    return filtered(dry, ports)


dry = scene()
out = record(dry)
unload_audio(out)
```